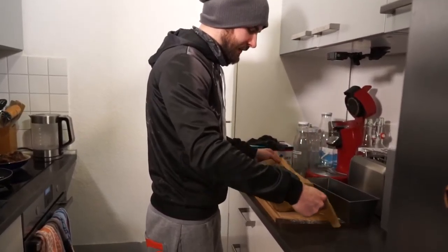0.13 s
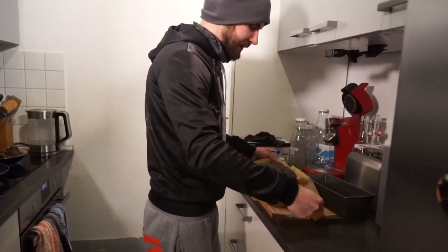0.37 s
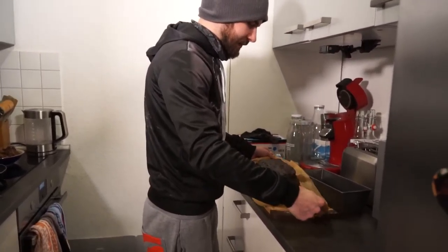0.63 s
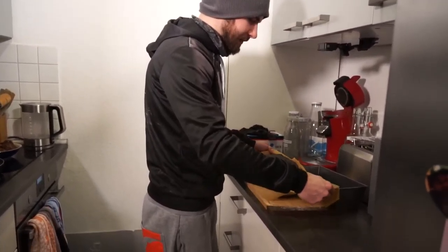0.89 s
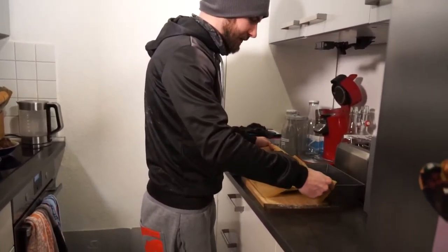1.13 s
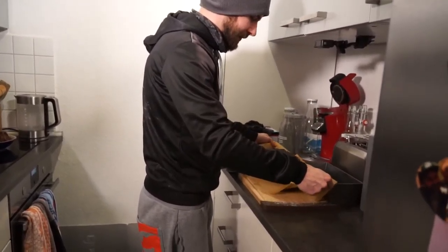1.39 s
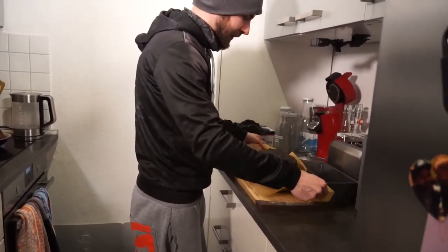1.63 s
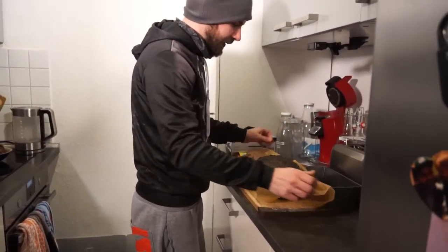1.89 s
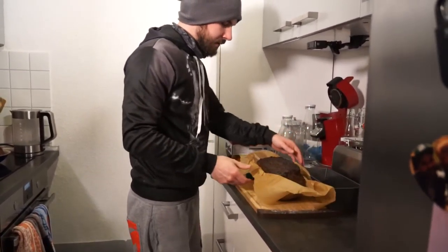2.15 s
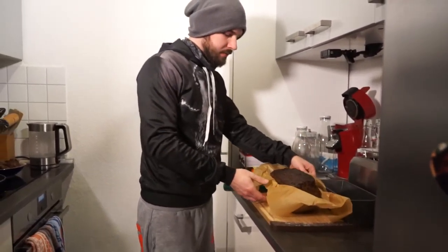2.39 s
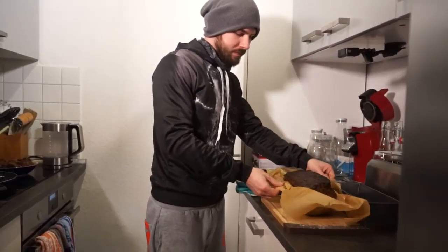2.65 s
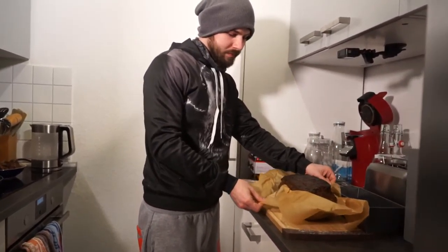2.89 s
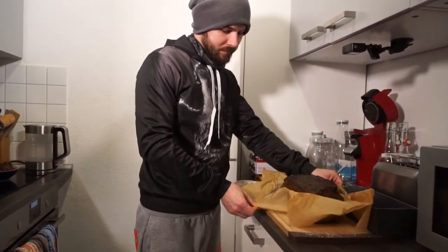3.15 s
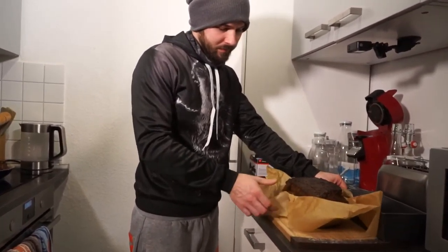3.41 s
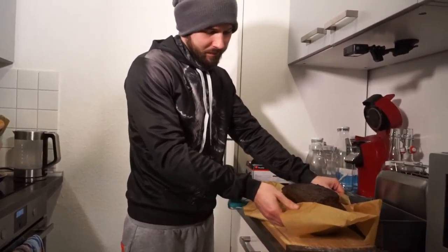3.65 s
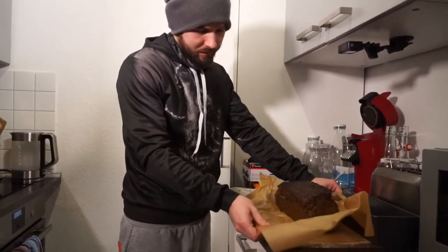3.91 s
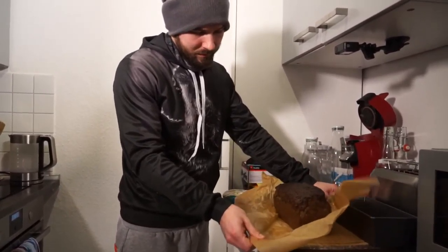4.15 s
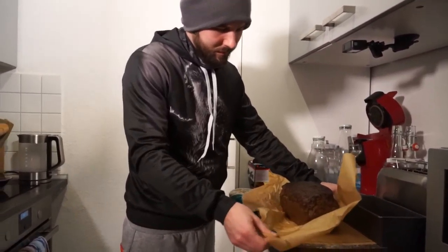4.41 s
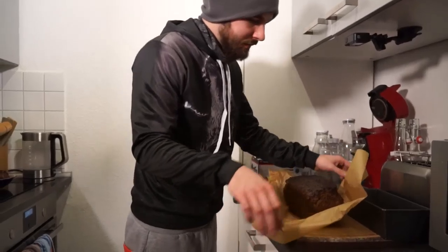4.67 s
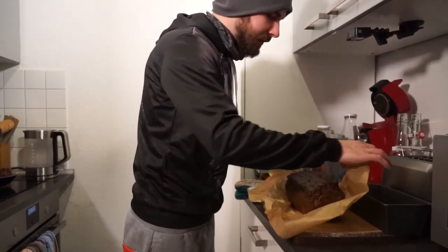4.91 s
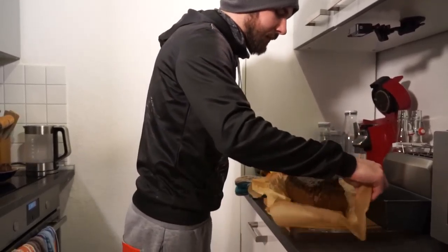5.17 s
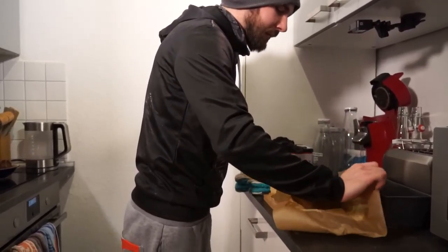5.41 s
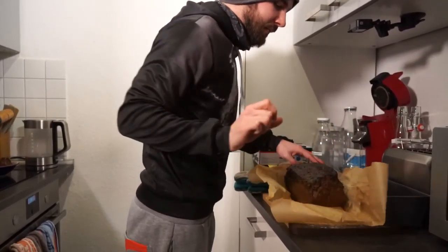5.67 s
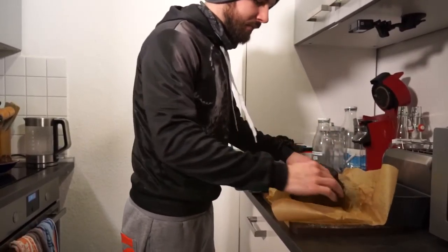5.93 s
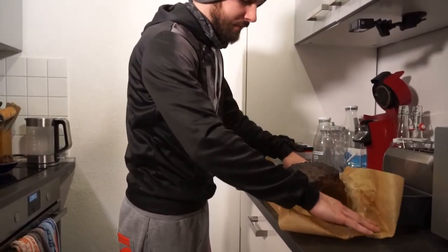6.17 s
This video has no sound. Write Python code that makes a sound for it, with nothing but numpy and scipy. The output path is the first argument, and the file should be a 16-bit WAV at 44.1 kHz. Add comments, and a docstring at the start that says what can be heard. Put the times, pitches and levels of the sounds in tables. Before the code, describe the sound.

Stiff baking parchment is handled close to a stereo microphone in a small, hard-walled kitchen. From 0 to about 1.9 seconds the crinkling is nearly continuous, a dense bright crackle swelling and easing with each tug, with lower, crunchier folds and brief hollow resonances. It drops to near quiet around 2.0 to 2.2, then restarts with small snaps and a sharp surge at 2.35 to 2.5. Strong rustling continues to about 3.3, dips into smaller separate crackles, and swells again from 3.7 to 4.3. After that it weakens, with light pops near 4.5 and near silence around 4.8. A firm pull rises from 5.0 to 5.5, then falls away. A small crackle at 5.75 and a last moderate rustle from 6.0 end it. Short diffuse reflections soften the clicks; faint airy room tone sits underneath, with little bass.

```python
"""Baking parchment in a kitchen

Stiff parchment is pulled and folded back from a loaf in a small hard-walled kitchen. Thousands of tiny
creases buckle each second as random clicks; larger folds give way in noisy bursts that ring the facets,
single creases pop, and passing hollows of the bent sheet colour the crackle as brief resonances.
Diffuse room tails smear the crackle into a rustle; faint shaped noise under it is the room tone."""
import sys
import numpy as np
from scipy import signal
from scipy.fft import rfft, irfft, next_fast_len
from scipy.io import wavfile
from scipy.ndimage import uniform_filter1d, map_coordinates

SR = 44100
rng = np.random.default_rng(int(sys.argv[2]) if len(sys.argv) > 2 else 0)


def ratio(d):
    """dB to gain"""
    e = np.asarray(d, float) / 20
    return 10 ** e


def store_wav(level_fs):
    """Save 16-bit WAV to argv[1]."""
    pcm = np.round(np.clip(np.atleast_2d(level_fs), -1, 1) * 32767)
    wavfile.write(sys.argv[1], SR, pcm.T.astype(np.int16))


N = 277830
CENTRES_HZ = 45 * 2 ** np.arange(0, 9.1, 0.5)


def rms_one(x):
    """Scale to unit rms."""
    return x / np.sqrt(np.mean(x ** 2) + 1e-20)


def at_hz(points, hz):
    """Read an (f/Hz, value) table on a log frequency axis."""
    table_hz, values = np.transpose(points)
    return np.interp(np.log(hz), np.log(table_hz), values)


def drift(rate_hz):
    """Slow random wander of unit rms: noise through two equal poles at rate_hz."""
    step = 40  # samples between computed points
    pole = np.exp(-2 * np.pi * rate_hz * step / SR)
    white = rng.standard_normal(N // step + 2002)
    slow = rms_one(signal.lfilter([1], [1, -2 * pole, pole ** 2], white)[2000:])
    return np.interp(np.arange(N) / step, np.arange(len(slow)), slow)


def bands(length):
    """Half-octave bands as overlapping cosine windows whose powers add to one."""
    hz = np.maximum(np.arange(length // 2 + 1) * SR / length, 1)
    windows = [np.cos(np.pi * np.clip(np.log2(hz / centre), -0.5, 0.5)) for centre in CENTRES_HZ]
    return hz, windows


def add_burst(envelope, start_s, level_db, peak_ms):
    """Add a quick rise, peaking after peak_ms, then a settling decay."""
    at = round(start_s * SR)
    t = np.arange(3000) / SR / (max(peak_ms, 0.1) / 1000)
    burst = ratio(level_db) * (t * np.exp(1 - t)) ** 2
    envelope[at:at + len(t)] += burst[:N - at]


# Left-right likeness of the diffuse sound: f/Hz, correlation [0..1]
STEREO_LIKENESS = [(60, 0.37), (150, 1), (380, 0.81), (950, 0.51), (2380, 0.63), (5980, 0.013),
                   (15000, 0.07)]


def stereo_noise(length, gain):
    """Diffuse noise mixed band by band from mid and side; gain(hz) shapes each band."""
    out = 0
    white = rfft(rng.standard_normal((2, 2, length)))  # neighbouring bands use separate noises
    for k, (hz, band) in enumerate(zip(CENTRES_HZ, bands(length)[1])):
        mid, side = irfft(white[k % 2] * band, length)
        alike = at_hz(STEREO_LIKENESS, hz)
        pair = np.sqrt(1 + alike) * mid + np.sqrt(1 - alike) * side * [[1], [-1]]
        out = out + gain(hz) * pair
    return out


# Room tone spectrum, shape only: f/Hz, level/dB per Hz
TONE_SPECTRUM = [(35, -55), (60, -25), (250, -6), (1000, -3), (2350, -2), (4200, -5), (12700, -8),
                 (16000, -12)]


def room_tone():
    """Steady diffuse noise of unit rms."""
    return rms_one(stereo_noise(N, lambda hz: ratio(at_hz(TONE_SPECTRUM, hz))))


# Low room modes: f/Hz, width/Hz, gain/dB
ROOM_MODES = [(213, 17, 5.5), (304.6, 22, 6.5), (412, 33, 8), (536, 38, 3), (772, 78, -3.5)]
# Reverberation time: f/Hz, T60/s
REVERB_T60 = [(150, 0.31), (800, 0.29), (3000, 0.22), (8000, 0.14), (15000, 0.038)]


def kitchen(x, count, stay_s):
    """Creases sound from changing spots, each with a diffuse tail; low modes colour the sum."""
    t, size = np.arange(SR // 2) / SR, next_fast_len(N + SR)
    stay_index = (np.arange(N) / (stay_s * SR)).astype(int)
    spot = rng.integers(0, count, N)[stay_index]
    gather = np.clip(t / 0.0049, 0, 1)  # reflections take a moment to gather

    def decay(hz):
        """Exponential decay of one band, with energy evened over T60."""
        t60_s = at_hz(REVERB_T60, hz)
        return ratio(-60 * t / t60_s) / np.sqrt(t60_s)

    out = 0
    for k in range(count):
        tail = gather * stereo_noise(len(t), decay)
        tail = tail / np.sqrt(np.sum(tail ** 2, axis=1, keepdims=True))
        here = uniform_filter1d(1.0 * (spot == k), size=65)  # soft switch between spots
        out = out + rfft(x * here, size) * rfft(tail, size)
    hz = np.arange(size // 2 + 1) * SR / size
    modes_db = sum(db / (1 + (2 * (hz - f) / width) ** 2) for f, width, db in ROOM_MODES)
    return irfft(out * ratio(modes_db), size)[:, :N]


def direct(x, lag_samples, spread_samples):
    """Creases all over the sheet reach two ports with a lag that keeps changing."""
    half = (lag_samples + spread_samples * drift(62)) / 2
    n = np.arange(N)
    return np.array([map_coordinates(x, [n - side * half], order=3, mode="nearest") for side in (1, -1)])


# Hollows of the bent sheet: middle t/s, f/Hz, rms level before fading/dB, half length/ms
SHEET_HOLLOWS = [(.464, 576, -43, 62), (.808, 734, -47.5, 130), (.933, 845, -41, 100),
                 (1.018, 730, -43.5, 64), (1.212, 870, -44, 53), (1.475, 1840, -42, 33),
                 (1.636, 605, -48, 110), (1.87, 870, -45, 53), (2.34, 1550, -35.5, 38),
                 (2.47, 3350, -35, 33), (2.574, 910, -49, 41), (2.865, 1600, -37, 27),
                 (2.973, 700, -37, 25), (3.255, 1540, -37, 29), (3.44, 1320, -45, 37),
                 (3.761, 1180, -38, 73), (3.926, 1390, -39, 58), (4.535, 1350, -50, 65),
                 (5.258, 634, -45, 38)]


def hollows(crackle):
    """Each passing hollow is a resonance driven by the crackle, swelling and fading."""
    out = np.zeros(N)
    for s, hz, level_db, half_ms in SHEET_HOLLOWS:
        half = round(half_ms * SR / 1000)
        part = slice(max(round(s * SR) - half, 0), round(s * SR) + half)
        b, a = signal.iirpeak(hz, 9.3, fs=SR)
        ringing = rms_one(signal.lfilter(b, a, crackle[part]))
        out[part] += ratio(level_db) * ringing * np.hanning(len(ringing))
    return out


# Tugs of the hands: full strength from t/s, relative crackle level/dB, held/ms, 20 dB swell/ms
HAND_TUGS = [(0.01, -24.5, 7.9, 280), (0.072, -25.5, 140, 97), (0.214, -27, 171, 36.0),
             (0.464, -24, 68, 81), (0.602, -27, 239.0, 62.0), (0.903, -29.5, 86, 170),
             (1.064, -28.5, 60, 250), (1.181, -27.5, 47.0, 44.0), (1.322, -31.5, 4.7, 79),
             (1.496, -25, 72, 173), (1.596, -29.3, 97.0, 261.0), (1.729, -32, 130, 70),
             (1.85, -27, 39, 123), (2.27, -43.5, 28, 6.0), (2.339, -31.5, 100, 12.0),
             (2.469, -25, 6.7, 126), (2.605, -26, 60, 107), (2.702, -26.5, 98, 85), (2.845, -26, 52, 90.0),
             (2.95, -26, 127, 94), (3.117, -26, 154, 22), (3.342, -32.5, 71, 71), (3.422, -29, 9.7, 4.5),
             (3.537, -32, 4.4, 41), (3.691, -26.5, 155, 91.0), (3.89, -26.5, 104, 90.0),
             (4.039, -26, 38, 90.0), (4.154, -26, 103, 12), (4.277, -27.5, 50, 230), (4.387, -32, 26, 62.0),
             (4.536, -32, 60, 55), (4.666, -36.5, 32, 32.0), (4.902, -36, 1.1, 10), (5.036, -34.5, 125, 48),
             (5.21, -25.5, 98, 143), (5.393, -27, 105, 216.0), (5.526, -31, 100, 16.0),
             (5.746, -40, 39, 10.0), (6.032, -37.5, 120, 21), (6.103, -32, 230, 36),
             (6.166, -29.5, 20.0, 60.0)]


def pull_db(t):
    """Each tug swells, holds and lets go; overlapping tugs add in power."""
    swell_db, release_db_per_s = 20, 184.5
    power = 1e-9
    for s, level_db, held_ms, swell_ms in HAND_TUGS:
        before_s = np.maximum(s - t, 0)
        after_s = np.maximum(t - s - held_ms / 1000, 0)
        tug_db = level_db - swell_db * before_s / (swell_ms / 1000) - release_db_per_s * after_s
        power = power + ratio(tug_db) ** 2
    return 10 * np.log10(power)


# Slack of the moving paper, which flexes in large facets: t/s, mean large-facet level/dB
PAPER_SLACK = [(0, 0.2), (0.35, 1), (0.9, 0.5), (1.3, 1.5), (1.55, 0.5), (1.9, 0.1), (2.4, -1), (2.75, 0.5),
               (3.2, 1.5), (3.45, -1.8), (3.8, -0.7), (4.1, 0.8), (4.35, -6), (5.1, -2.5), (5.3, 1.1),
               (5.65, -1.5), (6.1, -1), (6.3, -5.5)]


def facet_sizes(t):
    """Slack raises large facets and lowers small ones; both wander. Returns two dB curves."""
    small_per_slack, wander_db = -0.23, 1.5
    slack_db = np.interp(t, *np.transpose(PAPER_SLACK))
    return slack_db + wander_db * drift(9), small_per_slack * slack_db + wander_db * drift(2)


def facet_db(hz, level_db, large_db, small_db):
    """Large facets sound the low end, small ones the top."""
    large = np.clip(np.log2(2600 / hz), 0, 1)
    small = np.clip(np.log2(hz / 6500), 0, 1)
    return level_db + large * large_db + small * small_db


# Single creases popping: start t/s, relative peak level/dB
CREASE_SNAPS = [(0.5989, -20), (1.2657, -23), (1.7383, -21), (2.211, -41), (2.2665, -35), (2.2752, -32),
                (2.3422, -26), (2.3572, -21), (2.5414, -20), (2.7389, -17), (3.2929, -18), (3.7319, -17),
                (4.5459, -19), (4.8118, -46), (5.7443, -28), (5.7495, -29), (5.9783, -47), (6.0302, -29),
                (6.0677, -26)]


def snaps():
    """A crease pops as a very short burst of random-sign samples."""
    envelope = np.zeros(N)
    for s, level_db in CREASE_SNAPS:
        add_burst(envelope, s, level_db, peak_ms=0.35)
    return envelope * rng.choice([-1, 1], N)


# Folds giving way: mid-rise t/s, relative peak level/dB, facet ring f/Hz, half the rise/ms
LARGE_FOLDS = [(0.361, -27.5, 3960, 2.3), (0.4416, -23.5, 1770, 3.6), (0.5984, -45, 4080, 3.3),
               (1.0035, -26, 1780, 3.2), (1.1827, -23, 837, 2.4), (1.315, -30, 970, 5.7),
               (1.3887, -41, 2870, 2.2), (1.4223, -31, 4390, 4.0), (1.44, -33.5, 1840, 5.8),
               (1.738, -38, 2300, 4.9), (1.8108, -36, 3600, 4.0), (2.1557, -48, 1770, 4.5),
               (2.2099, -45.5, 2466, 3.9), (2.2722, -39, 4600, 1.7), (2.3353, -34, 1840, 3.9),
               (2.37, -27, 1500, 1.4), (2.5406, -33, 4960, 2.5), (2.585, -34, 2920, 5.2),
               (2.7591, -25.5, 1470, 4.7), (3.2919, -41, 3920, 4.0), (3.3554, -27.5, 3500, 4.3),
               (3.416, -31.5, 3770, 5.4), (3.5199, -35.5, 4380, 3.6), (3.537, -37, 4330, 3.3),
               (3.6277, -45, 4370, 3.3), (3.6604, -31.5, 4970, 5.7), (3.798, -26, 1610, 2.2),
               (3.8526, -32, 1420, 10), (4.1545, -24.5, 1690, 2.5), (4.419, -30.5, 2750, 1.7),
               (4.5062, -38.5, 4030, 4.0), (4.542, -28, 4440, 2.3), (4.669, -30, 2430, 4.0),
               (4.9013, -34, 1710, 3.2), (5.002, -43.5, 2800, 5.2), (5.032, -38, 3040, 2.4),
               (5.7436, -36.5, 2270, 3.8), (5.809, -40.5, 3000, 3), (5.9765, -51, 2430, 4.3),
               (6.0292, -38.5, 2020, 5.5), (6.1, -30.5, 3170, 5.7)]


def fold_envelope(hz, colours_db):
    """Fold bursts in one band, stronger near each fold's facet ring."""
    ring_gain_db, ring_octaves = 5.5, 0.38
    envelope = np.zeros(N)
    for (s, level_db, ring_hz, half_ms), (large_db, small_db) in zip(LARGE_FOLDS, colours_db):
        ring_db = ring_gain_db * np.exp(-(np.log2(hz / ring_hz) / ring_octaves) ** 2)
        band_db = facet_db(hz, level_db + ring_db, large_db, small_db)
        add_burst(envelope, s - half_ms / 1000, band_db, 2 * half_ms)
    return envelope


def crease_clicks(level_db):
    """Three trains of random clicks; a harder pull buckles more creases, at equal mean power."""
    creases_per_s, rate_db_per_db, size_spread_db = 9000, 0.63, 3.5  # rate at level -28 dB
    chance = np.clip(creases_per_s * ratio(rate_db_per_db * (level_db + 28)) / SR, 0, 1)
    sizes = rms_one(ratio(size_spread_db * np.minimum(rng.exponential(1, (3, N)), 5)))
    signs = rng.choice([-1, 1], (3, N))
    return sizes * signs * (rng.random((3, N)) < chance) / np.sqrt(chance)


# Radiation of the sheet: f/Hz, gain/dB
SHEET_GAIN = [(35, -79), (60, -66), (103, -36), (206, -19), (361, -17), (405, -16), (575, -12.5), (854, -1),
              (1210, -2), (2800, 2.5), (7280, 1.5), (12400, 5.5), (15700, 4.5)]


def parchment(common, clump_db, patch_db):
    """Buckling creases felt partly by the whole sheet, partly by facets of one size, plus folds and snaps."""
    t = np.arange(N) / SR
    level_db = np.interp(t, t[::40], pull_db(t[::40]))
    large_db, small_db = facet_sizes(t)
    colours_db = 3.5 * rng.standard_normal((len(LARGE_FOLDS), 2))  # large, small facets of each fold
    clicks = crease_clicks(level_db)
    clumps_db = clump_db * drift(67)  # creases set off their neighbours
    ragged = rms_one(rng.standard_normal(N) * ratio(2.5 * drift(250)))  # a fold goes in uneven jerks
    pops = snaps()
    size = next_fast_len(N)
    axis_hz, windows = bands(size)
    out = 0
    for k, (hz, band) in enumerate(zip(CENTRES_HZ, windows)):
        patches_db = patch_db * drift(32)
        gain = ratio(facet_db(hz, level_db, large_db, small_db) + clumps_db + patches_db)
        folds = fold_envelope(hz, colours_db) * ragged
        whole = np.sqrt(common) * clicks[2] * gain + folds + pops
        own = np.sqrt(1 - common) * clicks[k % 2] * gain
        # whole-sheet sound adds in amplitude across bands, own sound in power
        out = out + band ** 2 * rfft(whole, size) + band * rfft(own, size)
    return irfft(out * ratio(at_hz(SHEET_GAIN, axis_hz)), size)[:N]


def scene():
    """Paper heard directly and through the room, over the room tone."""
    paper_db, tail_db, tone_db = 2.5, -0.5, -57
    paper = ratio(paper_db) * parchment(common=0.36, clump_db=1.0, patch_db=1.0)
    paper = paper + hollows(paper)
    wet = ratio(tail_db) * kitchen(paper, count=10, stay_s=0.012)
    near = direct(paper, lag_samples=1.56, spread_samples=3.92)
    balance = ratio([[0.2], [-0.2]])  # left, right
    return (near + wet) * balance + ratio(tone_db) * room_tone()


def top_cut(x):
    """Nothing passes above the cut-off."""
    return signal.sosfilt(signal.butter(12, 17060, fs=SR, output="sos"), x)


def record(dry):
    """The microphone drops the bass; the top is cut steeply."""
    low_cut_hz, top_cut_hz = 144, 15730
    thin = signal.sosfilt(signal.butter(3, low_cut_hz, "high", fs=SR, output="sos"), dry)
    cut = signal.sosfilt(signal.ellip(14, 0.2, 70, top_cut_hz, fs=SR, output="sos"), thin)
    return top_cut(cut)


dry = scene()
out = record(dry)
store_wav(out)
```